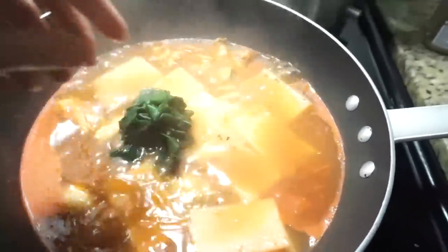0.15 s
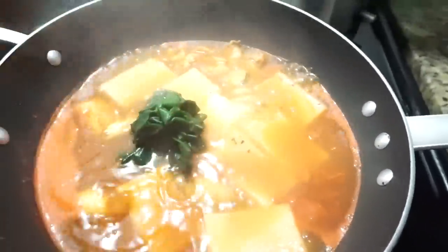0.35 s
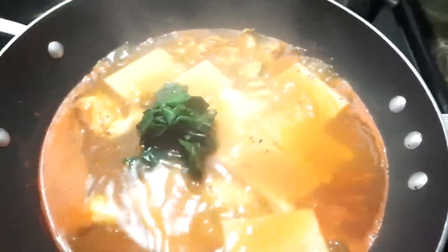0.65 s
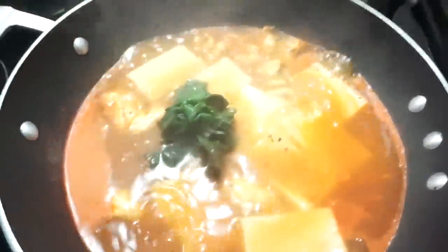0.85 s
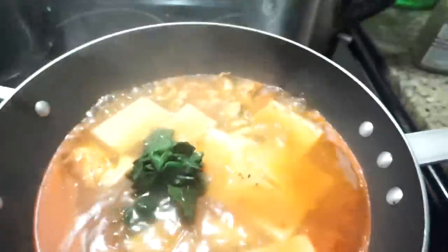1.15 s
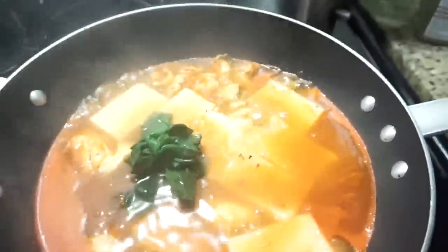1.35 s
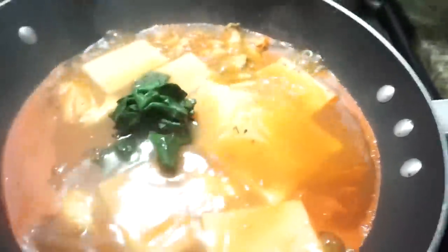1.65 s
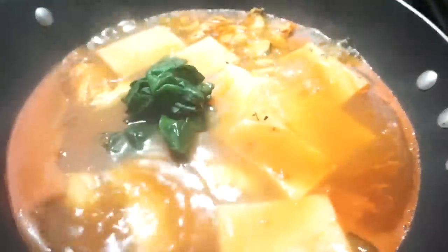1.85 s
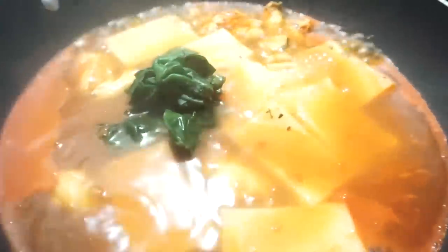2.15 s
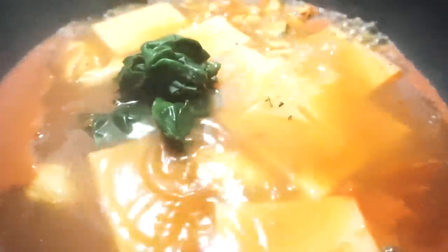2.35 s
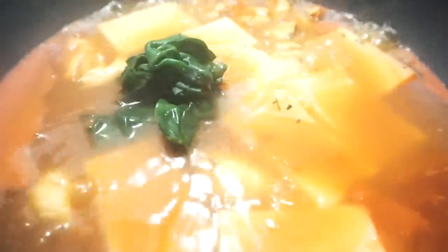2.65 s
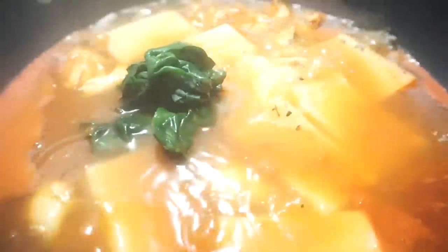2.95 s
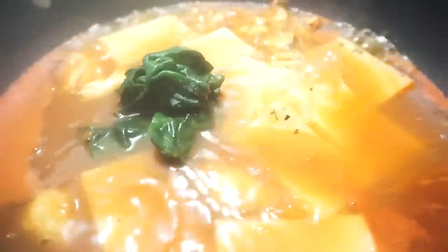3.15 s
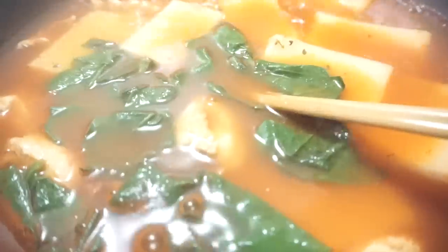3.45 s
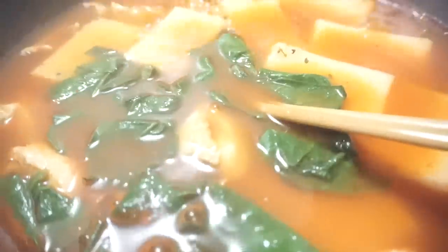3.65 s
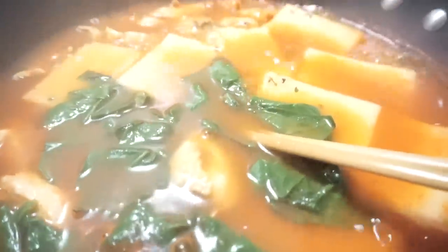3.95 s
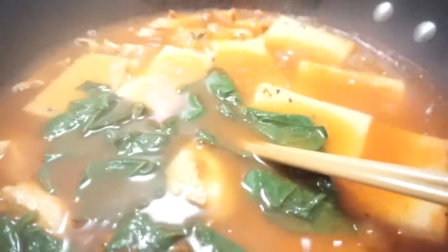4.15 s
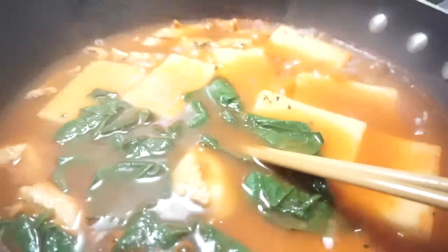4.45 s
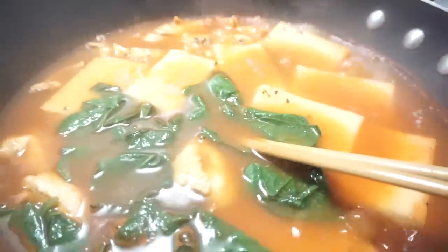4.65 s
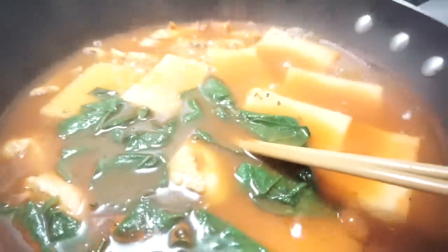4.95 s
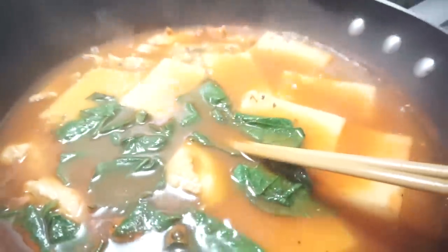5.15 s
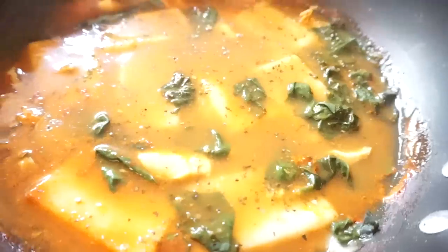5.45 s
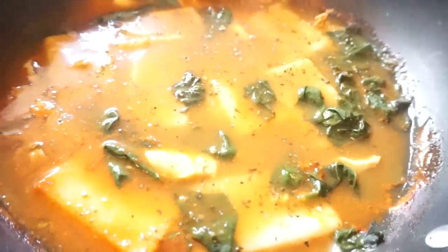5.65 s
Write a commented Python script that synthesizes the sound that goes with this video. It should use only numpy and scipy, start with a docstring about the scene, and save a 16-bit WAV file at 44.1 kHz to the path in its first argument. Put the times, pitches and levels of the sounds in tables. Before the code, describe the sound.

Loud wet bubbling comes first: irregular hollow blops, tiny froth pops, churning gurgle and occasional crisp droplet spits, close-miked in a pan with a very short reverberation. A brief silent gap leads to the same kind of bubbling far softer and sparser. A second gap leads to a distant, even simmer with no separate bubbles, barely audible at the end. No stirring or utensils are heard.

```python
"""A hard, loud boil of thick sauce in a frying pan, close to a two-port microphone, is heard first.
After short silent gaps come a quieter boil and then a far, smooth simmer at the rim of the pan.
Bubbles burst as short dull plops, made of swelling and dying sines that the pan reverberates and colours;
droplets spit as brief bursts of bright noise; gurgle, steam and simmer are shaped, patchy noise."""
import sys
import numpy as np
from scipy import signal
from scipy.fft import rfft, irfft, next_fast_len
from scipy.io import wavfile
from scipy.ndimage import uniform_filter1d

SR = 44100
rng = np.random.default_rng(int(sys.argv[2]) if len(sys.argv) > 2 else 0)


def store_pcm(level_fs):
    """Save levels as 16-bit WAV."""
    pcm = np.round(np.clip(level_fs, -1, 1) * 32767).astype(np.int16)
    wavfile.write(sys.argv[1], SR, np.atleast_2d(pcm).T)


N = 255055

LEAD_S = 0.00055  # a bubble peaks this early; the ringing of the bowl draws the heard peak later
SNAP_HZ = 2120  # the bursting skin rings near here


def amp(db):
    """Logarithmic level: decibels become an amplitude ratio."""
    return 10 ** (np.asarray(db) / 20)


def unit(x):
    """Root-mean-square normalisation: x is scaled to rms 1."""
    return x / np.sqrt(np.mean(x ** 2) + 1e-20)


def along(points, hz):
    """Logarithmic frequency scale: (Hz, value) points are joined by straight lines on it."""
    f, values = np.transpose(points)
    return np.interp(np.log(hz + 1), np.log(f + 1), values)


def curves(rows):
    """Linear interpolation in time: one value per sample for each column after the time."""
    s, *columns = np.transpose(rows)
    return [np.interp(np.arange(N) / SR, s, column) for column in columns]


def filtered(x, response):
    """Linear filtering: the spectrum of x is multiplied by a response of frequency."""
    m = next_fast_len(N + SR // 2)
    spectrum = rfft(x, m) * response(np.fft.rfftfreq(m, 1 / SR))
    return irfft(spectrum, m)[..., :N]


def band(f, hz, width_hz):
    """Damped resonance: a second-order band-pass response with gain 1 at its centre."""
    return 1j * f * width_hz / (hz * hz - f * f + 1j * f * width_hz)


def bursts(s, db, hz, place, cycles, size):
    """Damped oscillation: sines start a little sharp, swell softly and die; rows (centre, weighted by place)."""
    turns = np.arange(size) / SR * hz[:, None]
    life = turns / cycles  # 1 at the peak of the envelope
    envelope = (life * np.exp(1 - life)) ** 3.98
    tone = np.sin(2 * np.pi * (turns + 0.18 * np.tanh(life)))
    wave = envelope * tone * amp(db)[:, None]
    start = np.clip(s - LEAD_S - np.ravel(cycles) / hz, 0, None)
    at = (np.round(start * SR).astype(int)[:, None] + np.arange(size)).ravel()
    return np.array([np.bincount(at, (wave * w).ravel(), N + size)[:N] for w in (1, place[:, None])])


# Partial correlation of the two ports in the noise layers.
# Each row: frequency in Hz, left-right likeness from 0 to 1.
LIKENESS = [(60, 0.37), (270, 1), (570, 0.77), (1220, 0.77), (2590, 0.15), (5500, 0.16)]


def rush(spectrum, patchy_db):
    """Turbulence as filtered noise: partly correlated stereo of rms 1 with random patches of gain."""
    z = signal.stft(rng.standard_normal((2, N)), nperseg=256)[2]
    field = uniform_filter1d(rng.standard_normal(z.shape[1:]), size=5, axis=0)  # smooth over frequency
    field = uniform_filter1d(field, size=4, axis=1)  # smooth over time
    pair = signal.istft(z * amp(patchy_db * unit(field)), nperseg=256)[1][:, :N]

    def response(hz):
        # half the angle whose cosine is the likeness splits the power between mid and side
        turn = np.arccos(np.clip(along(LIKENESS, hz), -1, 1)) / 2
        return amp(along(spectrum, hz)) * [np.cos(turn), np.sin(turn)]

    mid, side = filtered(pair, response)
    return unit(np.array([mid + side, mid - side]))


def lumps(count, rise_s):
    """Amplitude modulation: short gulps over a quieter seethe, as a gain of rms 1."""
    when, size = rng.random((count, 2)).T
    kicks = np.bincount((when * (N - 1)).astype(int), amp(-14.0 * size), N)
    t = np.arange(SR // 20) / SR / rise_s
    gulps = np.abs(signal.fftconvolve(kicks, t * np.exp(1 - t))[:N])
    return unit(0.59 + gulps)


# Spectrum of the gurgling sauce.
# Each row: frequency in Hz, relative level in dB per Hz.
GURGLE_SPECTRUM = [(60, -54), (169, -15.5), (290, 4), (434, -15.5), (553, 1), (1020, -2), (1330, -6),
                   (2210, -10), (4000, -24), (7000, -35.5)]


def gurgle(gurgle_db, stir):
    """Modulated turbulence: noise comes in gulps and rises by up to 13 dB where a big bubble churns the sauce."""
    level = amp(gurgle_db - 11.5 + 13 * stir)
    return level * lumps(count=330, rise_s=0.0048) * rush(GURGLE_SPECTRUM, patchy_db=2.5)


# Spectrum of the steam.
# Each row: frequency in Hz, relative level in dB per Hz.
STEAM_SPECTRUM = [(1500, -11), (2400, 6.5), (4100, -3), (5700, 1), (6300, 0), (6900, -1), (8600, -1.5),
                  (10400, -1), (12000, -13.5)]


def steam(hiss_db, stir):
    """Jet noise: steam hisses as broadband noise, a little louder where the sauce is churned."""
    return amp(hiss_db + 4.3 * stir) * rush(STEAM_SPECTRUM, patchy_db=3.0)


def froth(level_db, count):
    """Small-bubble resonance: random bubbles hardly a cycle long, each with a skin snap and a low slump."""
    when, weak, a, b, place, low = rng.random((count, 6)).T
    s = when * (N - 1) / SR
    db = level_db[(s * SR).astype(int)] + 10.5 - 15 * np.sqrt(weak)
    octaves = 1.37 * (a + b - 1)  # relative to 960 Hz; bubbles far from it are fainter
    side = 0.69 * place - .9
    cavities = bursts(s, db - 4 * np.abs(octaves), 960 * 2 ** octaves, side, 0.78, size=700)
    snaps = bursts(s, db - 12 - 10 * a, SNAP_HZ * 2 ** (b - .5), side, 1.3, size=500)
    slumps = bursts(s + 0.0029, db - 14.0, 230 + 140 * low, side, 0.97, size=900)
    return cavities + snaps + slumps


# The clearest bubbles.
# Each row: time in seconds, relative peak level in dB, pitch in Hz,
# cycles to the peak (before limits).
BUBBLES = [(0.023, -10, 835, 0.59), (0.039, -9, 925, 0.67), (0.122, -6.5, 1050, 0.96),
           (0.144, -6.5, 1040, 1.1), (0.171, -10.5, 800, 3.5), (0.179, -7, 1930, 1.4),
           (0.179, -6.5, 845, 0.68), (0.195, -21.5, 870, 0.83), (0.292, -11.5, 834, 1.8),
           (0.313, -16, 910, 0.88), (0.37, -10, 760, 1.6), (0.387, -6.5, 930, 0.74),
           (0.419, -10.5, 2420.0, 3.8), (0.419, -10.5, 790, 1.3), (0.468, -4.5, 1430, 0.61),
           (0.481, -11, 910, 1.04), (0.517, -10.5, 900, 1.06), (0.548, -16.5, 727, 3.6),
           (0.568, -14.5, 670, 0.91), (0.625, -3.5, 980, 0.86), (0.666, -7.5, 820, 0.58),
           (0.763, -18, 1020, 1.4), (0.809, -11.5, 824, 1.5), (0.8235, -3, 970, 0.94),
           (0.912, -31, 690, 1.2), (1.002, -19, 726, 1.2), (1.022, -6.5, 920, 1.21),
           (1.134, -10.5, 910, 1.1), (1.14, -7.5, 1070, 1.06), (1.186, -7.5, 865, 0.79),
           (1.219, -15, 770, 2.4), (1.321, -5.5, 2010, 0.89), (1.321, -9.5, 915, 0.91),
           (1.41, -7.5, 830, 0.78), (1.442, -13, 890, 1.15), (1.472, -18.5, 1100, 0.98),
           (1.5, -8, 1150, 1.8), (1.534, -7.5, 975, 2.1), (1.556, -10.5, 1130, 1.6),
           (1.599, -10.5, 700, 0.88), (1.615, -15.5, 785, 0.56), (1.656, -9.5, 1420, 0.99),
           (1.675, -12.5, 790, 0.93), (1.699, -6.5, 1120, 1.53), (1.725, -7, 740, 0.6),
           (1.735, -14.5, 2110, 0.71), (1.739, -9.5, 516, 0.82), (1.767, -8.5, 750, 1.93),
           (1.821, -12.5, 865, 1.66), (1.854, -9.5, 1090, 0.85), (1.863, -11.5, 1990, 0.84),
           (1.864, -13.5, 920, 1.5), (1.877, -20, 620, 0.95), (1.895, -11.5, 1540, 1),
           (1.929, -11.5, 910, 0.99), (1.966, -15.5, 1730, 2.1), (1.978, -5, 1870, 0.8),
           (2.019, -9.5, 945, 1.8), (2.021, -8, 2150, 0.8), (2.041, -4.5, 1980, 0.8),
           (2.079, -6.5, 1530, 0.7), (2.08, -11, 3080, 2.1), (2.093, -8.5, 800, 0.85),
           (2.12, -16, 1010, 0.86), (2.177, -8.5, 2090, 1.56), (2.179, -10.5, 810, 0.83),
           (2.187, -7.5, 794, 1.02), (2.273, -16.5, 700, 1.1), (2.31, -18.5, 1510, 1),
           (2.314, -23.5, 580, 1.3), (2.342, -19.5, 890, 1), (2.361, -13.0, 1900, 0.74),
           (2.398, -18.5, 1020, 1), (2.442, -13, 860, 1), (2.465, -20, 595, 1.1), (2.478, -13.5, 800, 1.55),
           (2.515, -7, 1620, 1.8), (2.555, -7, 1970, 0.9), (2.622, -20, 654, 0.87),
           (2.649, -10.5, 1020, 1.2), (2.714, -9.5, 1540, 1.5), (2.7149, -6.5, 830, 1.29),
           (2.723, -10.5, 765, 0.73), (2.748, -3, 1830, 1.28), (2.747, -15.5, 790, 1.73),
           (2.846, -18.5, 560, 1.5), (2.922, -8.5, 830, 0.63), (2.944, -13, 1950, 3.6),
           (2.945, -7, 724, 1.4), (3.047, -14, 680, 0.59), (3.09, -7, 1670, 1.5), (3.111, -7.5, 930, 1.2),
           (3.166, -15, 1090, 1), (3.188, -14.5, 820, 1.7), (3.201, -10.5, 615, 0.85),
           (3.211, -12, 850, 1.46), (3.241, -4.5, 1020, 0.76), (3.396, -31, 1053, 1.3),
           (3.438, -30, 960.0, 1.3), (3.496, -26.5, 790, 1.1), (3.51, -35, 870, 1.1),
           (3.553, -34, 690, 1.18), (3.57, -30.5, 1950, 0.72), (3.604, -32.5, 770, 1.4),
           (3.638, -29, 724, 0.58), (3.65, -26, 2500, 0.8), (3.691, -38.5, 650, 1.25),
           (3.758, -23, 945, 2.88), (3.793, -37, 626, 1.02), (3.801, -30.5, 760, 1.3),
           (3.864, -33.5, 557, 1.34), (3.938, -31, 850, 1.5), (3.95, -33, 990, 3.66),
           (3.959, -21, 1020, 0.83), (3.972, -36, 955, 1.1), (3.987, -28, 670, 0.8), (4, -32.5, 960.0, 1.8),
           (4.106, -28, 745, 1.2), (4.133, -28.5, 870, 1.6), (4.195, -25.5, 900, 1.3),
           (4.207, -26.5, 1170, 0.69), (4.219, -23, 860, 1.31), (4.231, -25, 960.0, 0.59),
           (4.247, -33.5, 1530, 3.1), (4.314, -27.5, 830, 1.53), (4.357, -34.5, 587, 1.18),
           (4.421, -38, 560, 1.7), (4.499, -33, 600, 1.5), (4.51, -35.0, 1000, 3.47),
           (4.563, -34.5, 1000, 2.02), (4.608, -35.5, 2400, 2.8), (4.63, -26.5, 910, 0.9),
           (4.643, -36.5, 970, 1.7), (4.672, -35.5, 600, 1.45), (4.702, -26.5, 910, 1.1),
           (4.717, -34, 1210.0, 1.9), (4.727, -24.5, 1190, 1.2), (4.738, -29.5, 1270, 3.2),
           (4.761, -32, 2220, 2.9), (4.797, -35, 850, 1.5), (4.831, -39.5, 1010, 4.9),
           (4.888, -22, 970, 1.27), (4.942, -29, 760.0, 0.46), (4.956, -26, 960.0, 1.7),
           (4.974, -30, 1180, 0.48), (5.088, -27, 1450, 0.87), (5.095, -30, 815, 1.53),
           (5.108, -27.5, 2240, 0.72), (5.132, -29.5, 2180, 0.8), (5.175, -31.5, 790, 1.6),
           (5.188, -30.5, 505, 0.81), (5.222, -32, 786, 1.37), (5.266, -27.5, 950, 1.44)]


def plops():
    """Cavity resonance: each bubble rings at its own pitch, its skin snaps, sauce slumps, lesser bubbles follow."""
    s, db, hz, cycles = np.transpose(BUBBLES)
    cycles = np.clip(cycles, hz / 1900, 6)
    chance = rng.random((len(s), 13))
    place = 1.5 * chance[:, 0] - 1.1
    big_db = db - 3.6 * np.abs(np.log2(hz / 800))  # middling bubbles move the most sauce
    out = bursts(s, db - 3.0, hz, place, cycles[:, None], size=1000)
    snap_hz = SNAP_HZ * (1 + 0.23 * (2 * chance[:, 12] - 1))
    out = out + bursts(s, big_db - 12.5 - 3.3 * chance[:, 1], snap_hz, place, 1.17, size=500)
    out = out + bursts(s + 0.0024, big_db - 14.0, 240 + 130 * chance[:, 2], place, 0.64, size=900)
    for late, weak, pitch in chance[:, 3:12].T.reshape(3, 3, -1):  # three lesser bubbles each
        later_s = s + 0.004726 + 0.04 * late ** 2
        lesser_db = big_db - 10.5 - 9 * late - 13 * weak
        out = out + bursts(later_s, lesser_db, hz * 2.2 ** (pitch - .6), place, 0.98, size=700)
    return out


def stirring(gurgle_db):
    """Exponential relaxation, 0-1: big bubbles churn the sauce, which settles in a few hundredths of a second."""
    s, db = np.transpose(BUBBLES)[:2]
    at = (s * SR).astype(int)
    kicks = np.bincount(at, amp(db - gurgle_db[at] - 21.5), N)
    settling = np.exp(-np.arange(SR // 4) / SR / 0.014)
    return 1 - np.exp(-np.abs(signal.fftconvolve(kicks, settling)[:N]))


# Peaks and hollows of the air in the pan.
# Each row: frequency in Hz, width in Hz, level in dB of that peak or hollow alone.
PAN_MODES = [(445, 130, -5), (540, 143, 11.5), (1080, 108, 6.5), (1435, 230, 1.5), (2496, 110, -14)]


def bowl(x, wet_db):
    """Reverberation and air modes: walls answer with a short tail, new every tenth of a second; the bowl colours all."""
    out, step, t = np.zeros((2, N + SR)), SR // 10, np.arange(3000) / SR
    for start in range(0, N, step):
        tail = rng.standard_normal((2, len(t))) * amp(-60 * t / 0.079)
        tail = tail / np.linalg.norm(tail[0])
        piece = signal.fftconvolve(x[:1, start:start + step], tail, axes=1)
        out[:, start + 60:][:, :piece.shape[1]] += piece  # 60 samples of delay

    def colour(f):
        return np.prod([1 + (amp(db) - 1) * band(f, hz, width) for hz, width, db in PAN_MODES], axis=0)

    return filtered(x + amp(wet_db) * out[:, :N], colour)


# Shading of the ports by the body of the device.
# Each row: frequency in Hz, level in dB of the difference signal.
PORT_SHADING = [(100, -11), (500, -37.5), (1200, -2), (2500, 1), (6000, 8.5)]


def ports(x):
    """Acoustic shadowing: the body shades the ports, so place matters by an amount that depends on frequency."""
    side = filtered(x[1], lambda f: amp(along(PORT_SHADING, f)))
    return np.array([x[0] + side, x[0] - side])


# Spitting droplets.
# Each row: start in seconds, relative level in dB, level in dB of the top treble over it.
DROPLETS = [(0.427, -11.5, -13.5), (0.746, -21, -6.5), (1.3218, -25.5, -15), (1.561, -22.5, -18),
            (1.666, -26, -13.5), (2.0792, -11.5, -41.5), (2.0913, -16, -34), (2.1743, -24, -35),
            (2.255, -13, -1), (2.554, -23.5, -19), (2.665, -24, -33), (2.7463, -29.5, -15.5),
            (2.865, -30, 5), (2.9435, -19.5, -4.5), (3.51, -45, -33.5), (3.648, -30, -13),
            (3.8357, -36.5, -9), (4.18, -38.5, -19.5), (4.7212, -53.5, 7), (5.132, -38, 0.5)]


def spits():
    """Impulsive noise: a droplet cracks as bright noise a few ms long with a faint trail."""
    out, t = np.zeros((2, 2, N + 900)), np.arange(900) / SR  # (lower or top treble, port, time)
    rise = np.clip(t / 0.002, 0, 1) ** 1.38
    decay = 2.28 * amp(-60 * t / 0.0051) + 0.11 * amp(-60 * t / 0.056)
    for s, db, top_db in DROPLETS:
        noise = rng.standard_normal((3, len(t)))
        crack = (noise[0] + 4.88 * noise[1:]) * rise * decay  # a shared part and one per port
        out[..., round(s * SR):][..., :len(t)] += amp([db, db + top_db])[:, None, None] * crack
    lower = filtered(out[0, :, :N], lambda f: band(f, 3770, 3480) ** 2)
    top = filtered(out[1, :, :N], lambda f: band(f, 6960, 7000) ** 2)
    return lower + top


# Spectrum of the far simmer at the rim.
# Each row: frequency in Hz, relative level in dB per Hz.
RIM_SPECTRUM = [(60, -44), (105, -9), (165, -31), (212, -7), (260, -15.5), (620, -24.5), (820, -26),
                (930, -12.5), (1300, -9.5), (2500, -20.5), (3100, -27), (6400, -30.5), (11000, -46)]


def simmer():
    """Stationary noise: the far simmer merges into a smooth, steady rush."""
    return amp(-46.0) * rush(RIM_SPECTRUM, patchy_db=0.8)


# The three scenes.
# Each row: start in seconds, end in seconds, fade-out rate in dB per second.
SCENE_TIMES = [(-1, 3.273, 1900), (3.33, 5.268, 9000), (5.318, 6, 9000)]


def playing(scene):
    """Gain envelope: a scene swells evenly over 0.14 s, holds and fades out fast."""
    t, (start, end, cut_db_per_s) = np.arange(N) / SR, SCENE_TIMES[scene]
    return np.clip((t - start) / 0.14, 0, 1) * amp(-cut_db_per_s * np.clip(t - end, 0, 1))


# Course of the boil.
# Each row: time in seconds, relative gurgle level in dB, relative steam hiss level in dB.
BOIL_COURSE = [(0, -15, -27), (.4, -21.5, -39), (.95, -23, -46.5), (1.25, -20, -41.5), (1.8, -19.5, -49),
               (2.1, -23.5, -46.5), (2.6, -24, -51.5), (3.3, -21.5, -51), (3.33, -41, -68.5),
               (4.2, -42, -67.5), (5.27, -39, -66.5)]


def scene():
    """Superposition: bubbles, droplets, gurgle and hiss of two boils, then the simmer, each scene faded."""
    gurgle_db, hiss_db = curves(BOIL_COURSE)
    stir = stirring(gurgle_db)
    bubbles = plops() + froth(gurgle_db - 6.5 + 16 * stir, count=1000)
    bubbles = ports(bowl(bubbles, wet_db=-11))
    bed = gurgle(gurgle_db, stir) + steam(hiss_db, stir)
    boil = (bubbles + spits() + bed) * (playing(0) + playing(1))
    return boil + simmer() * playing(2)


def record(dry):
    """Transducer nonlinearity: after a bass cut, loud bubbles bend the capsule and round off; then a band limit."""
    x = filtered(dry, lambda f: (1j * f / (145 + 1j * f)) ** 3)
    x = x + 0.0066 * x ** 2  # the capsule bends a little one way
    x = x / (1 + np.abs(x / 0.74) ** 4) ** (1 / 4)  # loud peaks are rounded off
    return filtered(x, lambda f: (f > 15) * (f < 11150))


dry = scene()
out = record(dry)
store_pcm(out)
```